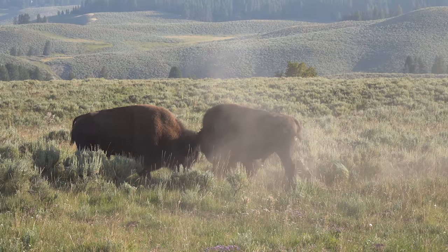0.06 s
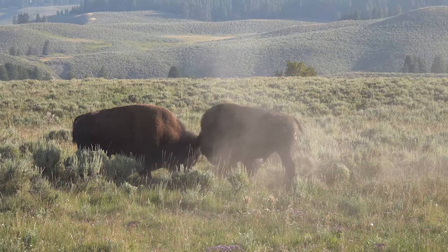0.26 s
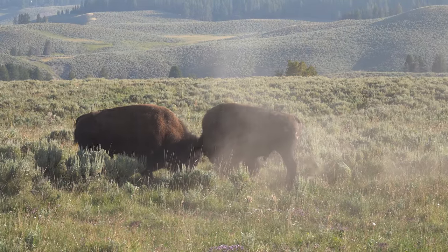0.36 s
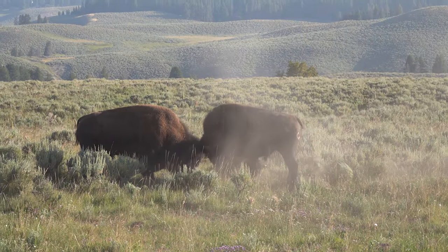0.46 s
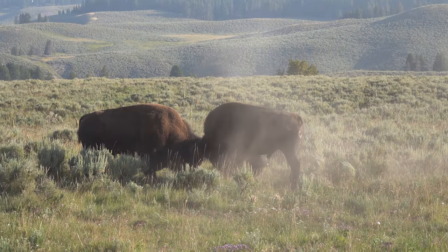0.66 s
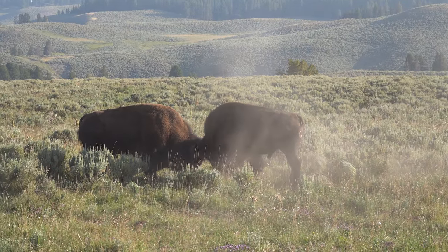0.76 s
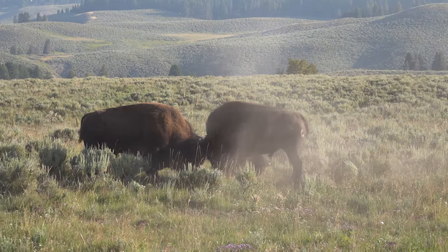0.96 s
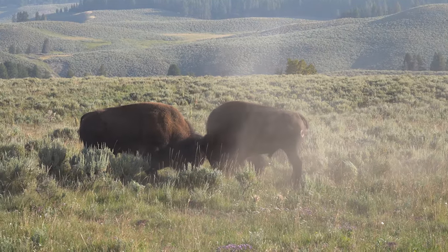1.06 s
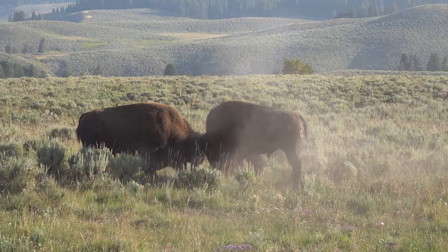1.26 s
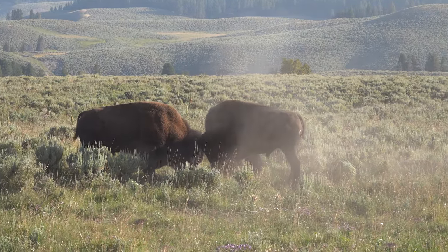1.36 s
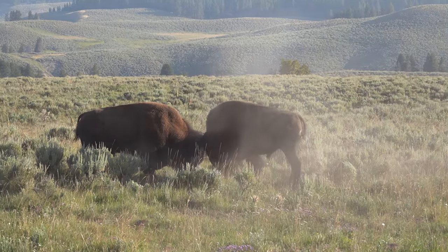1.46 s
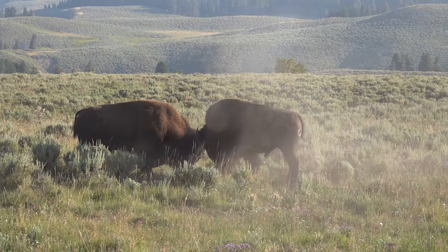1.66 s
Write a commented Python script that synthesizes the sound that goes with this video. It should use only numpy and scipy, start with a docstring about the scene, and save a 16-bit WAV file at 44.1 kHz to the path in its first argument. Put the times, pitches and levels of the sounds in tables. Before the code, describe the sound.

A bison gives one low, rattling bellow that swells, slows and stops, with a faint echo across an open valley. Steady wind and a far rumble lie behind it, while dry grass softly swishes and ticks near the microphone.

```python
"""A bison gives one low, rattling bellow in an open valley. Slow throat pulses make its deep
chest and mouth ring; they swell, then slacken and stop. Air puffs through its nose, and the
slopes send back a faint echo. Behind it are wind, a far rumble and a low throbbing hum.
Close by, dry grass swishes as blades brush together and ticks as stems snap."""
import sys
import numpy as np
from scipy import signal
from scipy.fft import rfft, irfft
from scipy.io import wavfile

SR = 44100
rng = np.random.default_rng(int(sys.argv[2]) if len(sys.argv) > 2 else 0)


def to_wav(sig):
    """Store sig (one row per channel, or 1-D mono) as 16-bit WAV at the path in sys.argv[1].

    Samples outside -1..1 are clipped; the rate is SR.
    """
    pcm = np.clip(np.atleast_2d(sig), -1, 1) * 32767
    pcm = np.round(pcm).astype(np.int16)
    wavfile.write(sys.argv[1], SR, pcm.T)  # frames by channels


N = 74970
TIME = np.arange(N) / SR
FREQS = np.fft.rfftfreq(N, 1 / SR)

# the bright tone of dry grass blades: f/Hz, relative level/dB
BLADE_TONE = [(1500, -35), (4000, -11.5), (7000, -13.5), (9500, -4), (11000, -5), (13000, -1.5),
              (14200, -13.5), (15500, -11.5)]


def amp(db):
    """Turns decibels into a number to multiply a sound by."""
    return 10 ** (np.asarray(db) / 20)


def unit(x):
    """Scales a sound to an average strength (rms) of 1."""
    return x / np.sqrt(np.mean(x ** 2) + 1e-20)


def over_hz(points, hz):
    """Reads between the rows of a frequency table, treating each octave alike."""
    f, value = np.transpose(points)
    return np.interp(np.log(hz + 1), np.log(f), value)


def over_time(points, s=TIME):
    """Reads between the rows of a time table."""
    return np.interp(s, *np.transpose(points))


def pan(db):
    """Left and right gains that make the left louder by db."""
    return amp(np.array([[.5], [-.5]]) * db)


def add(mix, s, sound):
    """Mixes a sound in, starting at s seconds."""
    part = mix[..., max(round(s * SR), 0):][..., :sound.shape[-1]]
    part += sound[..., :part.shape[-1]]


def colour(x, tone):
    """Shapes a sound's lows and highs by a table, at strength 1."""
    return unit(irfft(rfft(x) * amp(over_hz(tone, FREQS)), N))


def ringing_noise(hz, width):
    """Noise gathered around one frequency, at strength 1."""
    peak = 1 / (1 + (2 * (FREQS - hz) / width) ** 2) ** 1.5
    return unit(irfft(rfft(rng.standard_normal(N)) * peak, N))


def alike(a, b, likeness):
    """Blends two noises into left and right; likeness 1 makes both the same."""
    return np.array([a, likeness * a + np.sqrt(1 - likeness ** 2) * b])


def wind():
    """Wind makes a broad, steady rush, its bass nearly the same in both ears."""
    # tone of the wind: f/Hz, relative level/dB
    tone = [(25, -29), (36, -19.5), (50, -8), (65, -5), (120, -6.5), (215, -8), (290, -11.5), (390, -17.5),
            (490, -17), (680, -18.5), (1050, -24.5), (1310, -20), (1600, -31), (2000, -31.5), (3400, -41),
            (4050, -39.5), (5500, -49), (7300, -54), (12100, -52.5), (15500, -59)]
    # how alike the two ears are: f/Hz, likeness
    likeness = [(100, .999), (200, .988), (350, .92), (600, .8), (1200, .7), (2500, .3), (5000, -.1),
                (12000, .4)]
    # lean to the left: f/Hz, left minus right/dB
    lean = [(100, .35), (300, .6), (500, 1.6), (1150, 4.3), (2200, .8), (5000, -.5), (12000, 0)]
    # a slight swell: t/s, relative level/dB
    swell = [(0, 0.5), (.5, 1), (1.2, 2), (1.7, 0)]
    a, b = rfft(rng.standard_normal((2, N)))
    spectrum = alike(a, b, over_hz(likeness, FREQS)) * pan(over_hz(lean, FREQS))
    return amp(-36.5 + over_time(swell)) * colour(irfft(spectrum, N), tone)


def hum():
    """Two very low tones drift in and out of step, so their sum throbs."""
    t = TIME - .39  # in step, and so loudest, at .39 s
    return amp(-37) * np.sin(2 * np.pi * 32.3 * t) + amp(-41) * np.sin(2 * np.pi * 34.35 * t)


def rumble():
    """A far rumble of low noise rises and falls."""
    # its rise and fall: t/s, gain/dB
    swell = [(0, -11.5), (.12, -11), (.23, -2.5), (.3, -9.5), (.42, -3.5), (.6, -4.5), (1.3, -1.5),
             (1.7, -14)]
    # its noise bands: f/Hz, width/Hz, base level/dB
    bands = [(108.7, 66, -36), (179.7, 30, -36)]
    return amp(over_time(swell)) * sum(amp(db) * ringing_noise(hz, width) for hz, width, db in bands)


def crackle(tone):
    """A crowd of tiny clicks of uneven size, mostly alike in both ears."""
    clicks_per_s, spread_db = 3000, 3
    size = amp(spread_db * np.minimum(rng.exponential(1, (2, N)), 4))
    sign = rng.choice([-1, 1], (2, N))
    a, b = size * sign * (rng.random((2, N)) < clicks_per_s / SR)
    return colour(alike(a, b, likeness=.94), tone)


def grass():
    """Blades and stalks brush past each other in short swishes."""
    # the coarser tone of stalks: f/Hz, relative level/dB
    stalk_tone = [(800, -3.5), (2000, -4.5), (3000, -8), (4000, 0.5), (4900, -6.5), (6300, 2), (9000, -9),
                  (15000, -29.5)]
    # swishes: peak t/s, rise/s, fall/s, blade level/dB, stalks relative to blades/dB
    swishes = [(0.13, 0.022, 0.013, -45, 1), (.29, 0.058, 0.035, -52, -3.5),
               (.59, 0.11, 0.056, -52.5, -7.5), (.655, 0.038, 0.024, -52.5, -3.5),
               (0.701, 0.0056, 0.02, -35, -6.5), (0.771, 0.012, 0.029, -52.5, 1.5),
               (0.861, 0.01, 0.01, -50.5, -11), (1.115, 0.028, 0.022, -53, -6.5),
               (1.17, 0.014, 0.044, -53.5, -29), (1.276, 0.0092, 0.025, -56, -4.5),
               (1.54, .04, 0.48, -67.5, -4)]
    blades, stalks, out = crackle(BLADE_TONE), crackle(stalk_tone), np.zeros((2, N))
    for s, rise, fall, db, stalk_db in swishes:
        swell = np.exp(-np.maximum((s - TIME) / rise, (TIME - s) / fall))
        out += amp(db) * swell * (blades + amp(stalk_db) * stalks)
    return out * pan(db=-1.8)


def snaps():
    """Dry stems snap with a bright tick and a brief ring."""
    # snapping stems: t/s, tick level/dB, ring level/dB, left minus right/dB
    stems = [(0.577, -42, -54, -9), (0.604, -43, -65, -5), (0.6975, -46, -47.5, -16),
             (0.862, -46.5, -55, 0), (.881, -40, -62.5, -4), (1.164, -39, -68, -3), (1.177, -57, -66, 3),
             (1.192, -44, -69, -1.5), (1.256, -42.5, -62, -1.5), (1.268, -42.5, -45, -6),
             (1.468, -50, -49.5, 1), (1.5185, -48.5, -43.5, 12)]
    tick_fade_s, ring_fade_s = .0018, .004
    t, out = TIME[:SR // 30], np.zeros((2, N))
    for s, tick_db, ring_db, pan_db in stems:
        tick = colour(rng.standard_normal(N), BLADE_TONE)[:len(t)] * np.exp(-t / tick_fade_s)
        ring = unit(ringing_noise(hz=4000, width=1000)[:len(t)]) * np.exp(-t / ring_fade_s)
        add(out, s, pan(pan_db) * (amp(tick_db) * tick + amp(ring_db) * ring))
    return out


def throat(pulse_times):
    """Each throat pulse makes the chest and mouth ring with fading tones, part pure and part rough."""
    # ringing tones: base f/Hz, base width/Hz, base level/dB, roughness (0-1), build-up/s
    rings = [(150.4, 18.1, -23, 0.5, .003), (227.2, 23.7, -9.5, 0.07, 0.0013),
             (393, 40.4, -28, 0.8, 0.0033), (555.7, 51, -26, 0.51, 0.0028),
             (860.4, 57.6, -22.5, 0.81, 0.0021), (994.6, 53, -27, .45, 0.0044),
             (1280, 85, -41.5, 1, 0.00073)]
    # how hard the bison pushes: t/s, gain/dB
    effort = [(.62, -11), (.655, -9), (.71, -8), (.78, -5), (.84, -1), (.95, 1), (1.01, 3), (1.1, 2),
              (1.21, -1.5), (1.25, -2), (1.28, -3), (1.32, -21), (1.36, -4), (1.43, -19)]
    # the mouth opens and frees the upper tones: t/s, gain/dB
    mouth = [(.62, 2), (.8, 0), (1.0, 0.5), (1.15, 2.5), (1.28, 6.5), (1.36, -3)]
    # the throat tightens, then sags at the end: t/s, factor on frequency
    tension = [(.62, .96), (.8, .99), (1.05, 1.02), (1.22, 1.01), (1.36, .93)]
    # how fast the ringing dies: t/s, factor on width (wider dies sooner)
    damping = [(.65, .72), (.88, .72), (1.0, .9), (1.25, .95), (1.36, .7)]
    wobble_db, jitter_s = 1.1, .0002  # chance changes in each pulse's level and timing
    t, out = TIME[:SR // 8], np.zeros(N)
    air = [ringing_noise(hz, 2 * width) / np.sqrt(2) for hz, width, *_ in rings]
    chance = rng.standard_normal((len(pulse_times), 2 + len(rings)))
    for s, (time_luck, pulse_luck, *ring_luck) in zip(pulse_times, chance):
        for k, (hz, width, db, rough, build_s) in enumerate(rings):
            pure = (-1) ** k * np.sin(2 * np.pi * hz * over_time(tension, s) * t)
            breath = air[k][round(s * SR):][:len(t)]
            ring = np.sqrt(1 - rough ** 2) * pure + rough * breath
            level = db + over_time(effort, s) + over_time(mouth, s) * (k > 1)
            level += wobble_db * (pulse_luck + ring_luck[k]) / 2
            rise = (1 - np.exp(-t / build_s)) ** 2
            fade = np.exp(-np.pi * width * over_time(damping, s) * t)
            add(out, s + jitter_s * time_luck, amp(level) * ring * rise * fade)
    return out


def nose(pulse_count):
    """Air hisses through the nostrils, with a puff on each throat pulse."""
    # strength of the breath: t/s, gain/dB
    breath = [(.7, -25), (.8, -10.5), (.86, -8.5), (.95, -6.5), (1.03, -9.5), (1.22, -15.5), (1.35, -18)]
    # bands of hiss: f/Hz, width/Hz, base level/dB
    bands = [(2830, 160, -59), (3382, 190, -55.5), (3980, 300, -65)]
    puffs = .96 + np.exp(-(pulse_count % 1) / .61)
    hiss = sum(amp(db) * ringing_noise(hz, width) for hz, width, db in bands)
    return amp(over_time(breath)) * puffs * hiss


def bellow():
    """One run of slowing pulses drives both the throat and the nose."""
    # pace of the throat pulses: t/s, rate/Hz
    pulse_rate = [(.62, 39.6), (.68, 36.8), (.73, 36.1), (.79, 37.6), (.87, 35.8), (1.07, 34.9),
                  (1.17, 32.8), (1.27, 29.9), (1.34, 24.4), (1.43, 5.2)]
    calling = (TIME >= .6212) & (TIME < 1.45)
    pulse_count = np.cumsum(over_time(pulse_rate) * calling) / SR
    # a pulse fires each time the count passes a whole number
    pulse_times = TIME[np.flatnonzero(np.diff(np.ceil(pulse_count)))]
    return throat(pulse_times) + calling * nose(pulse_count)


def valley(x):
    """The ground and slopes scatter a faint echo, a little different in each ear."""
    # length of the echo: f/Hz, time to fade by 60 dB/s
    fade_times = [(100, 0.54), (300, 0.66), (1000, 0.13), (4000, 0.067)]
    echo_db, stereo_width = -18, .293
    hz, t, noise = signal.stft(rng.standard_normal((2, SR // 2)), SR, nperseg=256)
    fade = amp(-60 * t / over_hz(fade_times, hz)[:, None])
    middle, side = signal.istft(noise * fade, SR, nperseg=256)[1]
    tail = (middle + stereo_width * np.array([side, -side])) / np.linalg.norm(middle)
    return amp(echo_db) * signal.fftconvolve(x[None], tail, axes=1)[:, :N]


def ears(x, lead):
    """Sound from one side reaches the two ears out of step."""
    angle = over_hz(lead, FREQS)
    return irfft(rfft(x) * np.exp(1j * np.array([[1], [-1]]) * angle / 2), N)


def arrive(voice):
    """The voice arrives without its deepest bass, its middle range stronger on the left."""
    # lean to the left: f/Hz, left minus right/dB
    lean = [(200, -0.2), (400, 3), (700, 1), (1100, 2.5), (2400, -7), (4400, 6)]
    low_cut_hz = 44
    bass_cut = 1 / np.sqrt(1 + (low_cut_hz / (FREQS + 1)) ** 6)
    return irfft(rfft(voice) * pan(over_hz(lean, FREQS)) * bass_cut, N)


def scene():
    """The bison in its valley, with wind behind and grass in front."""
    # how far the left ear is ahead for the grass: f/Hz, phase/rad
    grass_lead = [(1500, .1), (3700, .3), (5000, 2.4), (7200, 1.7), (9000, .6), (13000, -.35),
                  (15300, -1.1)]
    # the same for the bison: f/Hz, phase/rad
    bison_lead = [(60, .1), (150, .3), (230, .5), (400, .62), (700, .25), (950, .5), (1250, .1),
                  (3400, .15)]
    around = wind() + hum() + rumble() + ears(grass() + snaps(), grass_lead)
    bison = bellow()
    return around + arrive(ears(bison + valley(bison), bison_lead))


def record(dry):
    """Cuts away the very highest treble."""
    high_cut_hz = 15700
    treble_cut = signal.firwin(511, high_cut_hz, window=("kaiser", 9), fs=SR)
    return signal.oaconvolve(dry, treble_cut[None], "same")


dry = scene()
out = record(dry)
to_wav(out)
```